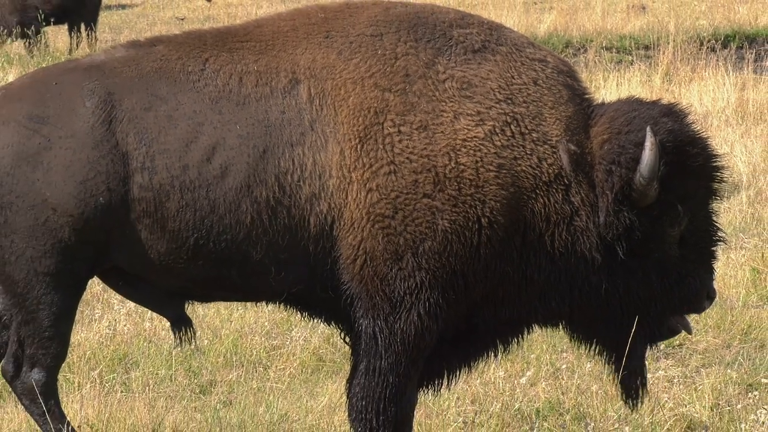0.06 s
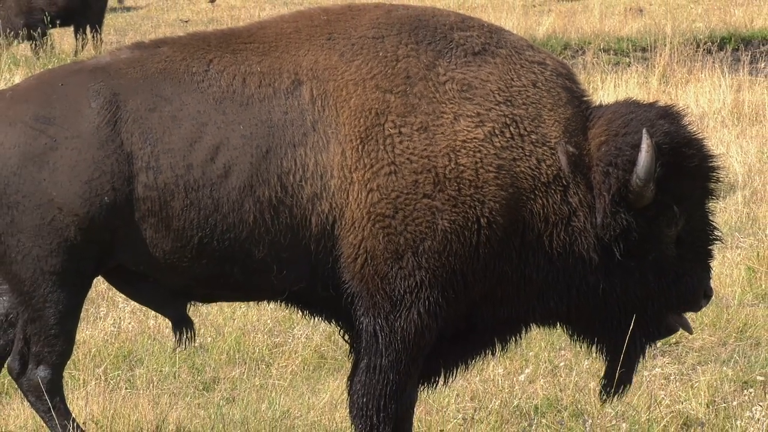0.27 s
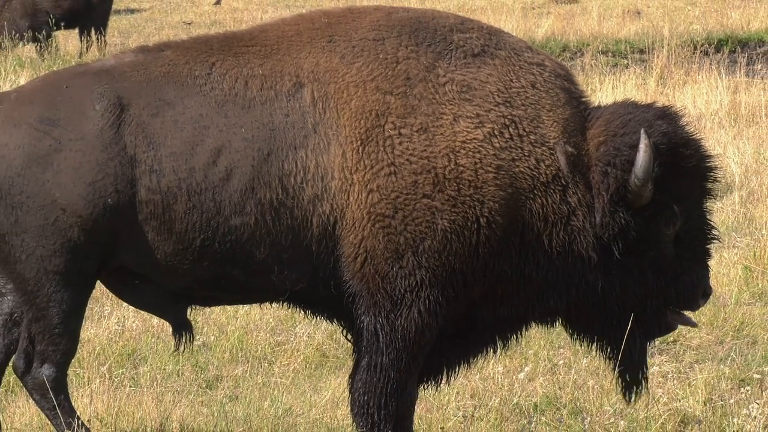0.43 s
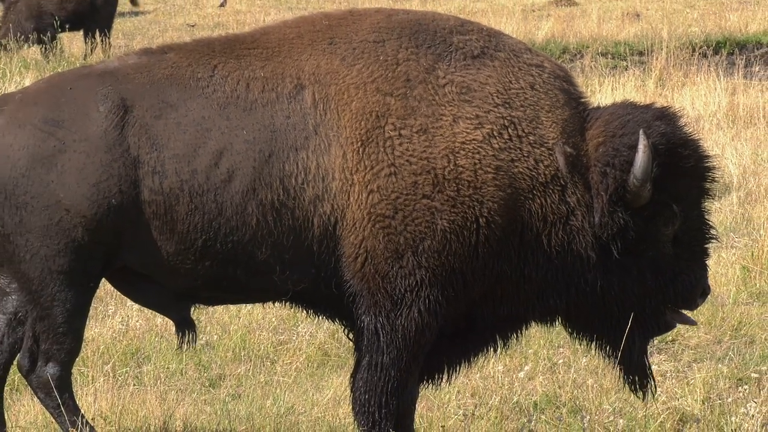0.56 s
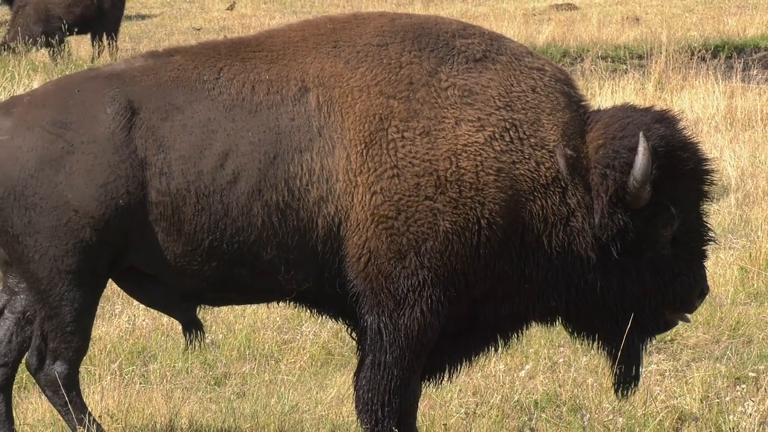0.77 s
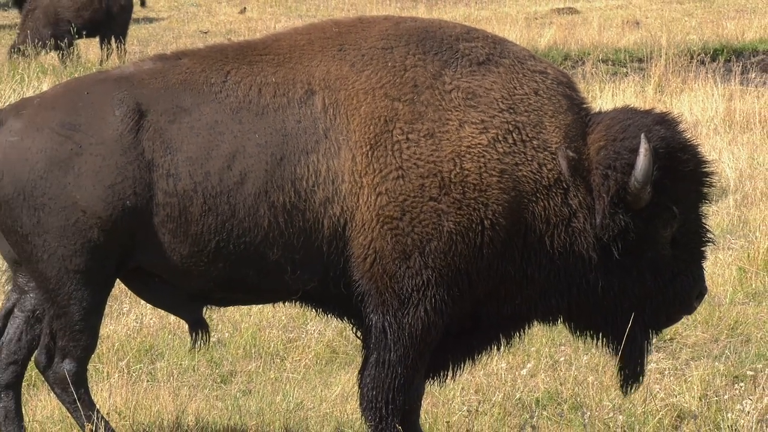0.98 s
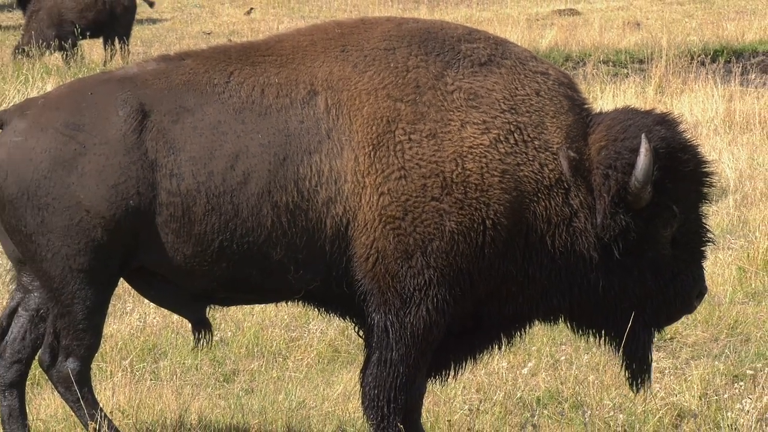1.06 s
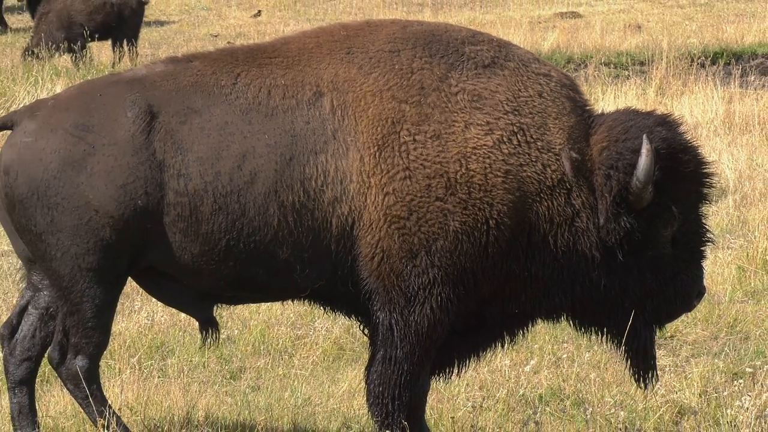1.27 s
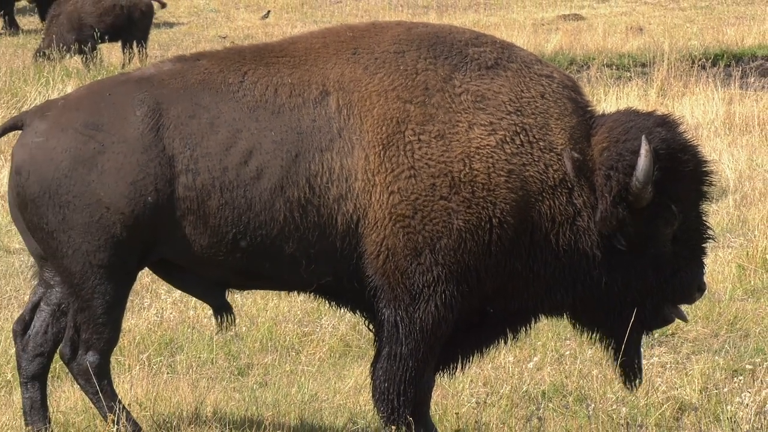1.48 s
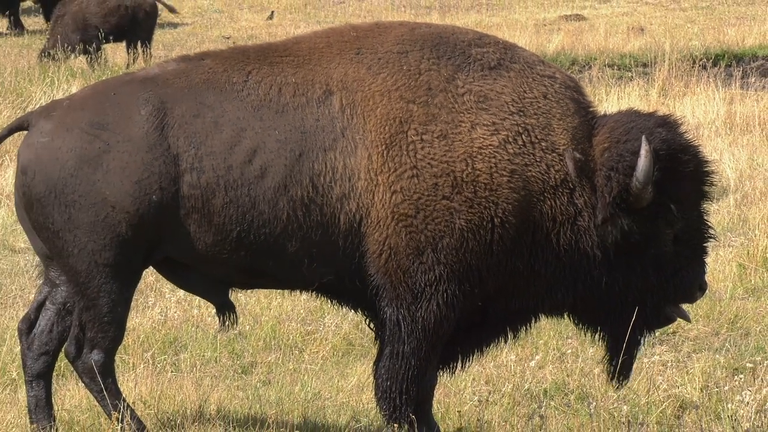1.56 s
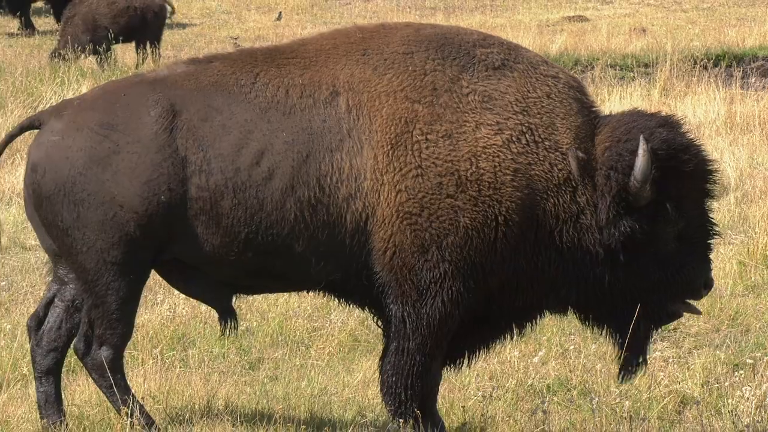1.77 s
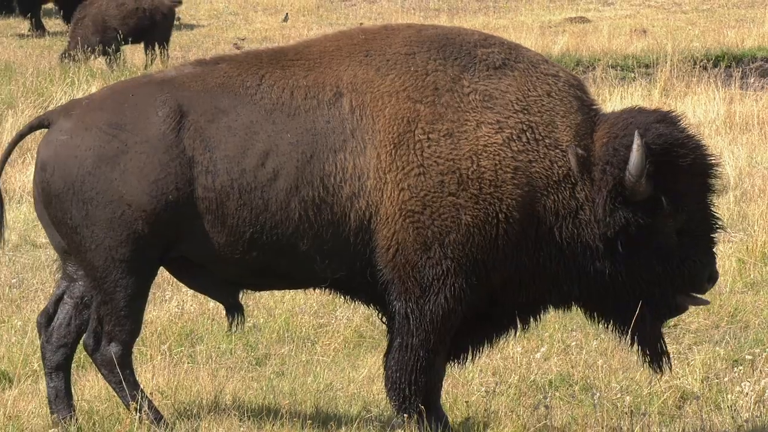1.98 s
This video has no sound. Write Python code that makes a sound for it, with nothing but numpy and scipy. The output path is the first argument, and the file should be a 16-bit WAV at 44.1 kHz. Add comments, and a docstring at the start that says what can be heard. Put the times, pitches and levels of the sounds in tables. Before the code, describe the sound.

A bison bull close by gives two deep, rattling grunts over low rumbling herd growls in a meadow

```python
"""Open meadow: a bison bull, close and left, grunts twice, deep and loud enough to overload the microphone.
Each grunt: slow pulses ring throat and chest in a swelling rattle, end in thumps, with snorts and
rushes of noise through muzzle resonances. Behind: pulsed growls and sine hoots of other bulls, low
rustle, chirps of gliding tones, ticks of decaying noise, flickering noise bands for air and grass."""
import sys
import numpy as np
from scipy import signal
from scipy.io import wavfile
from scipy.ndimage import uniform_filter1d

SR = 44100
rng = np.random.default_rng(int(sys.argv[2]) if len(sys.argv) > 2 else 0)


def put_to_file(sound):
    """Save the sound as 16-bit audio at rate SR, in the file named by the first command-line argument."""
    columns = np.atleast_2d(sound).T  # one column per channel
    safe = np.clip(columns, -1, 1)
    whole_steps = np.round(safe * 32767)
    wavfile.write(sys.argv[1], SR, whole_steps.astype(np.int16))


N = 88200
T = np.arange(N) / SR

# ground and slope echoes: delay_s, level_db
ECHOES = [(0.046, -22.5), (.113, -35.5), (.19, -43)]
ECHO_CUT_HZ = 700
VOICE_RIGHT_DB, VOICE_RIGHT_LAG_S, AIR_RIGHT_DB = -14, 0.00086, -17.5


def bull():
    """Voice and air share one pulse train; ground and slope return dulled copies."""
    pulses = throat_pulses()
    voice = bull_voice(pulses)
    air = bull_air(pulses)
    near = place(voice, VOICE_RIGHT_DB, VOICE_RIGHT_LAG_S) + place(air, AIR_RIGHT_DB)
    dull = butter(voice + air, ECHO_CUT_HZ, "low")
    echoes = sum(from_db(db) * np.interp(T - delay, T, dull, left=0) for delay, db in ECHOES)
    return near + place(echoes, right_db=-8, lag_s=0.0012)


# rattle of each grunt: first_pulse_s, pulse_rate_hz, resonance_at_0_db_effort_hz, ring_length_s
GRUNT_RATTLES = [(0.0548, 44.0, 202.7, 0.024), (1.459, 46.6, 216.8, 0.052)]
# effort curve of each grunt: time_s, effort_db
GRUNT_EFFORT = [
    [(.05, -15), (.08, -6.5), (.105, -6.5), (.15, -0.5), (.19, 2), (.228, 7.5)],
    [(1.455, -18.5), (1.5, -7.5), (1.55, 2.5), (1.572, 6), (1.595, 1), (1.62, 0), (1.645, -10.5)],
]
PULSE_JITTER_S, THROAT_RISE_HZ_PER_DB, RATTLE_DB = 0.00044, 1.0, 0.5


def throat_pulses():
    """Slow, nearly even pulses (start_s, level_db, resonance_hz, ring_length_s); effort raises the pitch."""
    pulses = []
    for (start, rate, rest_hz, length), curve in zip(GRUNT_RATTLES, GRUNT_EFFORT):
        curve_s, curve_db = np.transpose(curve)
        times = np.arange(start, curve_s[-1], 1 / rate)
        times = times + PULSE_JITTER_S * rng.standard_normal(size=40)[:len(times)]
        for time, effort_db in zip(times, np.interp(times, curve_s, curve_db)):
            hz = rest_hz + THROAT_RISE_HZ_PER_DB * effort_db
            pulses.append((time, effort_db + RATTLE_DB, hz, length))
    return pulses


# single closing pulses: start_s, drive_db, resonance_hz, width_hz, ring_length_s
THUMPS = [(0.2589, 12.5, 219.6, 13.4, 0.037), (0.3015, -2.5, 224, 15, 0.04),
          (1.6594, 2.5, 211.5, 19.8, 0.044), (1.6965, -3, 145.6, 26.4, 0.057)]
THROAT_WIDTH_HZ = 22.3
CHEST_HZ, CHEST_WIDTH_HZ, CHEST_DB, CHEST_RING_S = 146.6, 31, -13, 0.046
VOICE_LOW_HZ, VOICE_HIGH_HZ = 109.3, 370


def bull_voice(pulses):
    """Each pulse and thump rings a throat resonance and, weaker, the fixed chest resonance."""
    rattle = rings([(s, db, hz, THROAT_WIDTH_HZ, length) for s, db, hz, length in pulses])
    throat = rattle + rings(THUMPS)
    chest = rings([(s, db + CHEST_DB, CHEST_HZ, CHEST_WIDTH_HZ, CHEST_RING_S)
                   for s, db, *_ in pulses + THUMPS])
    return butter(throat + chest, [VOICE_LOW_HZ, VOICE_HIGH_HZ], "band", order=3)


# air flow of each grunt, before pulsing: time_s, flow_db
AIR_FLOW = [
    [(0, -57), (.08, -35.5), (.14, -31.5), (.24, -28.5), (.315, -24.5), (.34, -24.5), (.385, -19),
     (.415, -37), (.52, -31.5), (.58, -55)],
    [(1.42, -47), (1.48, -39.5), (1.52, -29.5), (1.61, -30), (1.675, -37.5), (1.705, -22.5), (1.728, -28.5),
     (1.755, -20), (1.793, -26), (1.82, -35), (1.9, -43)],
]
# snorts, before smoothing: start_s, flow_db, decay_s
SNORTS = [(.2615, -13.5, 0.018), (.3055, -26, 0.0074), (1.607, -20.5, 0.0044), (1.641, -18.5, .014),
          (1.688, -18.5, 0.0094), (1.702, -32, 0.0036)]
# clicks into the muzzle, before low-pass: start_s, impulse_db
SMACKS = [(0.3073, 11.9), (1.7024, 10.9)]
# hiss relative to muzzle tone, stronger in the second grunt: time_s, level_db
HISS_LEVEL = [(.4, -14.5), (1.5, -10.5)]
# relative spectrum of turbulent hiss: frequency_hz, density_db_per_hz
HISS_SPECTRUM = [(200, 8), (500, -14.5), (1100, 5), (1800, -19.5), (3000, -13.5), (5000, -16), (8000, -19),
                 (15000, -30)]
# faint muzzle whistles as the air runs out: centre_s, length_s, level_db
WHEEZES = [(0.391, 0.048, -32), (1.789, 0.045, -27)]
AIR_PULSING, AIR_PULSE_DECAY_S, AIR_PULSE_LAG_S = 1.96, 0.0066, 0.0013
SMACK_CUT_HZ, WHEEZE_HZ = 1510, 1710


def bull_air(pulses):
    """Turbulent flow puffs after each throat pulse, drives the muzzle and hisses around it."""
    puffs = bursts([(s + AIR_PULSE_LAG_S, 0, AIR_PULSE_DECAY_S) for s, *_ in pulses])
    pulsing = 1 + AIR_PULSING * (puffs - .2)
    steady = sum(from_db(in_time(curve)[0]) * during(curve) for curve in AIR_FLOW)
    flow = uniform_filter1d(steady * pulsing + bursts(SNORTS), size=50)

    clicks = np.zeros(N)
    for s, db in SMACKS:
        clicks[int(s * SR)] = from_db(db)
    white = rng.standard_normal(N)
    drive = flow * white + butter(clicks, SMACK_CUT_HZ, "low", order=3)
    tone = muzzle(drive) / np.std(muzzle(white))

    hiss_noise = rms_one(banded_noise(HISS_SPECTRUM, flicker_db=0.0)[0])
    hiss = from_db(in_time(HISS_LEVEL)[0]) * flow * hiss_noise
    wheeze_level = sum(from_db(db) * swell(s, length) for s, length, db in WHEEZES)
    return tone + hiss + wheeze_level * whistle(WHEEZE_HZ, wobble=0.0287)


# muzzle resonances: resonance_hz, width_hz, gain_db
MUZZLE = [(406, 41, 4), (595, 60, -1.5), (810, 59, 2), (916.5, 68, 7.5), (1165, 101, 3), (1411, 84, 2),
          (1704, 125, -5.5), (2355, 160, -9.5), (2814, 43, -12.5), (3130, 420, -24), (3600, 400, -49)]


def muzzle(x):
    """Resonances of nose and mouth in parallel, alternating in sign, low-passed."""
    out = 0
    for k, (hz, width_hz, db) in enumerate(MUZZLE):
        out = out + (-1) ** k * from_db(db) * resonate(x, hz, width_hz)
    return butter(out, 4000, "low")


# second bull's growl curve: time_s, pulse_rate_hz, resonance_hz, level_db
GROWL = [(.36, 66, 140.2, -24), (.43, 72, 149, -22.5), (.5, 83, 149, -29), (.56, 58, 226, -20),
         (.65, 54, 207, -17), (.7, 51.2, 193, -20), (.745, 49, 147, -15), (.8, 39.3, 134, -20),
         (.88, 78, 140, -36)]
# far bulls: pulse_rate_hz, resonance_hz, mean_level_db, right_db
FAR_BULLS = [(72.75, 108, -29.5, -17.5), (40.75, 153.4, -30.5, -2.5), (54.86, 193, -32, -8)]
# low hoots: centre_s, length_s, pitch_hz, level_db
HOOTS = [(.495, 0.091, 81, -16.5), (1.018, 0.14, 84.8, -24.5), (1.468, 0.084, 90.3, -23)]
GROWL_WIDTH_HZ, GROWL_JITTER, GROWL_RIGHT_DB = 45, 0.0244, -15.5
FAR_WIDTH_HZ, FAR_JITTER, FAR_SWING_DB = 47.4, .07, 1.4


def herd():
    """One bull growls mid-distance; further ones rumble as pulse trains and hoot as sine swells."""
    rate, hz, db = in_time(GROWL)
    level = from_db(db) * during(GROWL)
    out = place(level * growl(rate, hz, GROWL_WIDTH_HZ, GROWL_JITTER), GROWL_RIGHT_DB)
    for rate, hz, db, right_db in FAR_BULLS:
        level = from_db(db + FAR_SWING_DB * drift(9))
        out = out + place(level * growl(rate, hz, FAR_WIDTH_HZ, FAR_JITTER), right_db, lag_s=0.0009)
    for s, length, hz, db in HOOTS:
        hoot = from_db(db) * swell(s, length) * np.sin(2 * np.pi * hz * T)
        out = out + place(hoot, GROWL_RIGHT_DB)
    return out


def growl(rate_hz, hz, width_hz, jitter):
    """Uneven throat pulses ring one resonance, dulled by distance; rms 1."""
    cycles = np.cumsum(rate_hz * np.exp(jitter * drift(15))) / SR + rng.random()
    at = np.flatnonzero(np.diff(np.floor(cycles)))
    levels_db = 2.2 * rng.standard_normal(size=400)[:len(at)]
    hz_curve = hz + 0 * T
    pulses = [(T[i], db, hz_curve[i], width_hz, .06) for i, db in zip(at, levels_db)]
    return rms_one(butter(rings(pulses), [75, 520], "band"))


# swells of low rustle: centre_s, length_s, level_db
SCUFFS = [(.66, 0.24, -38.5), (1.075, 0.16, -34)]
SCUFF_LOW_HZ, SCUFF_HIGH_HZ = 282.6, 713


def scuffs():
    """Low rustle: band-passed noise that swells and fades."""
    level = sum(from_db(db) * swell(s, length) for s, length, db in SCUFFS)
    noise = rms_one(butter(rng.standard_normal(N), [SCUFF_LOW_HZ, SCUFF_HIGH_HZ], "band"))
    return place(level * noise, right_db=-15.5)


# falling chirps, lower voice: start_s, length_s, start_hz, end_hz (approached), level_db
CHIRPS = [(0.234, 0.072, 9900, 8050, -38), (0.563, 0.085, 10700, 8750, -47),
          (1.52, 0.055, 10800, 8370, -38), (1.867, 0.071, 9150, 7800, -39)]
# arched call curve: time_s, pitch_hz, mean_level_db
FAR_BIRD = [(.495, 3930, -69), (.525, 5300, -58), (.54, 6180, -50.5), (.555, 5730, -57), (.572, 5330, -55)]
CHIRP_FALL_S, CHIRP_WOBBLE, BIRD_RIGHT_DB = 0.024, 0.0062, -11.5
UPPER_VOICE_RATIO, UPPER_VOICE_DB = 1.075, -6
FAR_FLUTTER_DB = 6


def birds():
    """Thin two-voiced chirps fall exponentially in pitch; one arched call flutters further off."""
    far_hz, far_db = in_time(FAR_BIRD)
    far_level = from_db(far_db + FAR_FLUTTER_DB * drift(98)) * during(FAR_BIRD)
    out = far_level * whistle(far_hz, wobble=0.033)
    for s, length, start_hz, end_hz, db in CHIRPS:
        age = np.clip(T - s, 0, length)
        hz = end_hz + (start_hz - end_hz) * np.exp(-age / CHIRP_FALL_S)
        lower = whistle(hz, CHIRP_WOBBLE)
        upper = from_db(UPPER_VOICE_DB) * whistle(hz * UPPER_VOICE_RATIO, CHIRP_WOBBLE)
        out = out + from_db(db) * np.sin(np.pi * age / length) * (lower + upper)
    return place(out, BIRD_RIGHT_DB)


# dry grass ticks and rustles: start_s, level_db, decay_s
TICKS = [(.412, -31, 0.00062), (.455, -45.5, 0.13), (.904, -36.5, 0.00093), (.928, -35, .0015),
         (1.1, -46.5, 0.043), (1.312, -43, 0.04), (1.351, -48, 0.0013), (1.804, -40, .001),
         (1.826, -38, .0015)]
TICK_LOW_HZ, TICK_HIGH_HZ = 1200, 6760


def grass_ticks():
    """Dry stalks tick and rustle: sudden band-passed noise, decaying exponentially."""
    noise = rms_one(butter(rng.standard_normal(N), [TICK_LOW_HZ, TICK_HIGH_HZ], "band", order=1))
    return place(bursts(TICKS) * noise, right_db=-20)


# relative spectrum of open-air rumble: frequency_hz, density_db_per_hz
RUMBLE_SPECTRUM = [(25, -22), (40, -7), (65, 7), (100, -0.5), (166, 2), (215, -6.5), (270, -9), (330, -10),
                   (500, -21.5), (700, -23.5), (1100, -22.5), (1500, -26.5), (3600, -38), (16000, -49.5)]
# relative spectrum of grass hiss: frequency_hz, density_db_per_hz
BREEZE_SPECTRUM = [(300, -8), (450, 12.5), (1000, -7), (2000, -25.5), (4000, -19), (8000, -21),
                   (16000, -20)]
RUMBLE_DB, RUMBLE_FLICKER_DB = -29, 2
BREEZE_DB, BREEZE_FLICKER_DB = -41.5, 2.06


def meadow():
    """Low open-air rumble and breeze in the grass, as flickering noise bands."""
    rumble = from_db(RUMBLE_DB) * banded_noise(RUMBLE_SPECTRUM, RUMBLE_FLICKER_DB)
    breeze = from_db(BREEZE_DB) * banded_noise(BREEZE_SPECTRUM, BREEZE_FLICKER_DB)
    return rumble + breeze


# stereo lean of the noise: frequency_hz, left_over_right_db
LEAN = [(60, 24), (110, 7.0), (200, 10.5), (380, 11), (700, 7), (1290, 9), (2380, 5), (4400, 2.5),
        (8120, 6), (15000, 1)]


def banded_noise(spectrum, flicker_db):
    """Half-octave bands of flickering stereo noise, leaning left; rms 1."""
    out = 0
    edges_hz = 22 * 2 ** np.arange(0, 10, .5)
    white = rng.standard_normal((2, 2, N))  # neighbouring bands use different noise
    for k, (low, high) in enumerate(zip(edges_hz, edges_hz[1:])):
        hz = np.sqrt(low * high)
        sides = from_db(at_hz(LEAN, hz) * np.array([[.5], [-.5]]))
        sides = sides / np.sqrt(np.mean(sides ** 2))
        level = from_db(at_hz(spectrum, hz) + flicker_db * drift(30))
        out = out + sides * level * butter(white[k % 2], [low, high], "band")
    return rms_one(out)


RING_ATTACK_S, DAMPING_S = 0.0015, 0.0095


def rings(pulses):
    """Each pulse (start_s, drive_db, hz, width_hz, length_s) sets a sine ringing until damped."""
    out = np.zeros(N)
    for s, db, hz, width_hz, length in pulses:
        first = max(int(s * SR) + 1, 0)
        last = max(int((s + length + DAMPING_S) * SR), 0)
        age = T[first:last] - s
        attack = 1 - np.exp(-age / RING_ATTACK_S)
        decay = np.exp(-np.pi * width_hz * age)
        damping = np.clip((length - age) / DAMPING_S + .5, 0, 1)
        out[first:last] -= from_db(db) * attack * decay * damping * np.sin(2 * np.pi * hz * age)
    return out


def resonate(x, hz, width_hz):
    """Two-pole resonance, peak gain 1."""
    r = np.exp(-np.pi * width_hz / SR)
    zeros = np.array([1, 0, -1]) * (1 - r * r) / 2
    poles = [1, -2 * r * np.cos(2 * np.pi * hz / SR), r * r]
    return signal.lfilter(zeros, poles, x)


def whistle(hz, wobble):
    """A pure tone with randomly wandering pitch."""
    return np.sin(2 * np.pi * np.cumsum(hz * (1 + wobble * drift(170))) / SR)


def drift(corner_hz):
    """Slow random wander of spread 1: low-passed noise, computed every 40 samples."""
    step = 40
    r = np.exp(-2 * np.pi * corner_hz * step / SR)
    noise = rng.standard_normal(N // step + 2002)
    slow = signal.lfilter([1], [1, -2 * r, r * r], noise)[2000:]  # drop the filter's start-up
    return np.interp(np.arange(N) / step, np.arange(len(slow)), rms_one(slow))


def bursts(rows):
    """Envelope of sudden puffs (start_s, level_db, decay_s)."""
    return sum(from_db(db) * (T >= s) * np.exp(-np.abs(T - s) / decay) for s, db, decay in rows)


def swell(centre_s, length_s):
    """A smooth rise and fall."""
    return np.cos(np.pi * np.clip((T - centre_s) / length_s, -.5, .5))


def during(rows):
    """1 while a curve lasts, with soft edges."""
    return uniform_filter1d(1. * ((T >= rows[0][0]) & (T <= rows[-1][0])), size=400)


def in_time(rows):
    """Columns of a curve at every sample."""
    s, *columns = np.transpose(rows)
    return [np.interp(T, s, column) for column in columns]


def at_hz(points, hz):
    """Read a spectrum on a log-frequency axis."""
    points_hz, points_db = np.transpose(points)
    return np.interp(np.log(hz), np.log(points_hz), points_db)


def place(x, right_db, lag_s=0):
    """A source on the left reaches the right channel weaker and, with a lag, later."""
    return np.array([x, from_db(right_db) * np.interp(T - lag_s, T, x)])


def butter(x, hz, kind, order=2):
    """Butterworth filter."""
    return signal.sosfilt(signal.butter(order, hz, kind, fs=SR, output="sos"), x + 1e-18)


def from_db(db):
    """Decibels to gain."""
    return 10 ** (np.asarray(db) / 20)


def rms_one(x):
    """Scale to unit power."""
    return x / np.sqrt(np.mean(x ** 2) + 1e-20)


def scene():
    """The bull in front of herd, rustle, birds, grass and meadow."""
    return bull() + herd() + scuffs() + birds() + grass_ticks() + meadow()


CLIP_LEVEL, STOPBAND_HZ = .99, 16500


def record(dry):
    """The microphone clips the loudest swings flat; a steep zero-phase low-pass cuts the top."""
    clipped = np.clip(dry, -CLIP_LEVEL, CLIP_LEVEL)
    low_pass = signal.cheby2(16, 50, STOPBAND_HZ, fs=SR, output="sos")
    return signal.sosfiltfilt(low_pass, clipped)


dry = scene()
out = record(dry)
put_to_file(out)
```